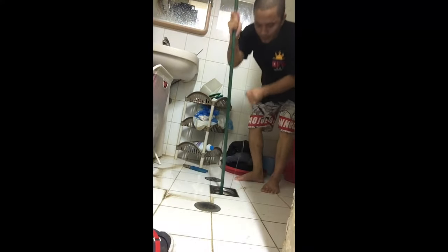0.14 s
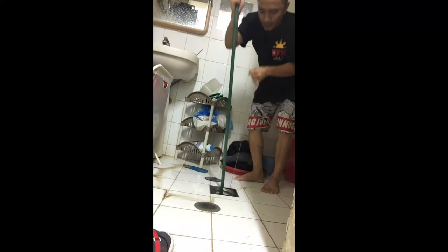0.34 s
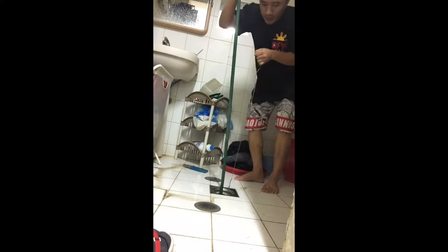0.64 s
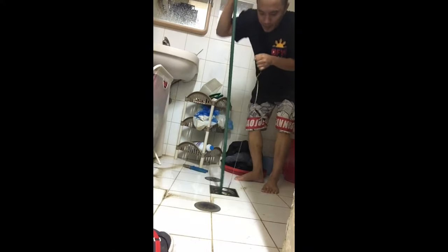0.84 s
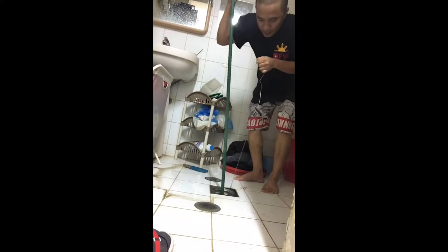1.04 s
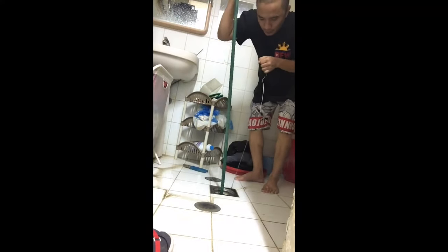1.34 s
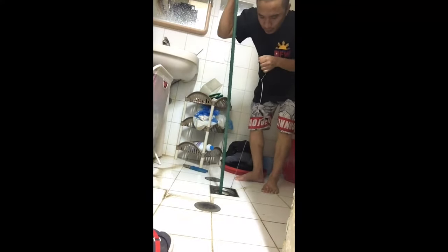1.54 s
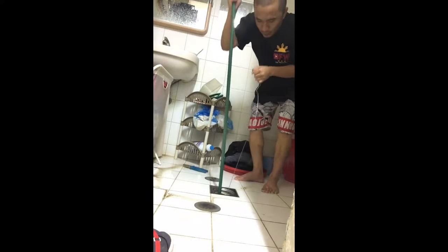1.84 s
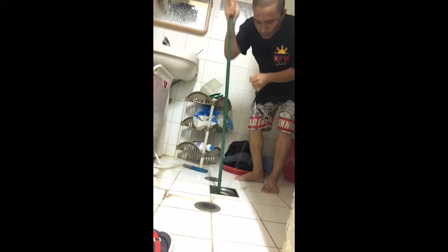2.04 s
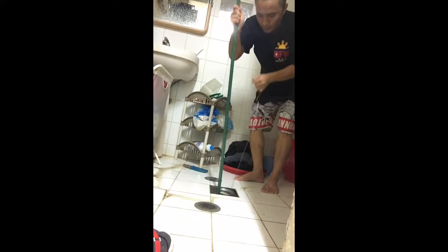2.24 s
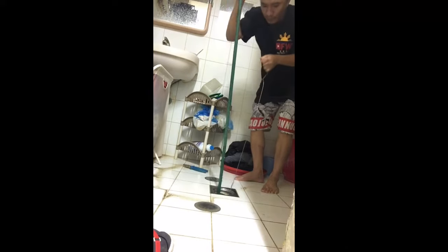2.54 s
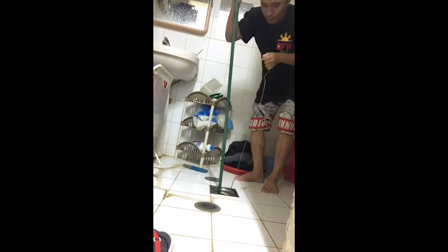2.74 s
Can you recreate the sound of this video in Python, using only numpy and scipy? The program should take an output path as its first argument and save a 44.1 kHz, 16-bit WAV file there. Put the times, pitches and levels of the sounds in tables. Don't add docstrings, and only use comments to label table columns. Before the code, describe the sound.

A pole plunger works a clogged floor drain: a rough, gulping water surge, a sharp knock and bubbles, a quiet gap, then scattered knocks and a second surge; small reverberant tiled bathroom, close microphone.

```python
import sys
import numpy as np
from scipy import signal
from scipy.fft import rfft, irfft
from scipy.io import wavfile
from scipy.ndimage import uniform_filter1d

SR = 44100
rng = np.random.default_rng(int(sys.argv[2]) if len(sys.argv) > 2 else 0)


def dump_mix(stems):
    frames = np.atleast_2d(stems).T
    limited = np.clip(frames, -1, 1)
    pcm = np.round(limited * 32767).astype(np.int16)
    wavfile.write(sys.argv[1], SR, pcm)


def volts_from_db(level):
    exponent = np.asarray(level, float) / 20
    return 10 ** exponent


N = 125685


def rms_one(x):
    return x / np.sqrt(np.mean(x ** 2) + 1e-20)


def bandpass(x, order, low_hz, high_hz):
    return signal.sosfilt(signal.butter(order, [low_hz, high_hz], "band", fs=SR, output="sos"), x)


def resonate(x, hz, width_hz):
    r = np.exp(-np.pi * width_hz / SR)
    poles = [1, -2 * r * np.cos(2 * np.pi * hz / SR), r * r]
    return signal.lfilter([(1 - r * r) / 2, 0, (r * r - 1) / 2], poles, x + 1e-18)


def shapes(rows, fall_db_s):
    start, rise, hold = np.array(rows)[:, :3].T[:, :, None]
    t = np.arange(N) / SR - start
    rise = np.abs(rise) + 1e-4
    return np.clip(t / rise, 0, 1) ** 2 * volts_from_db(-fall_db_s * np.maximum(t - rise - hold, 0))


def drift(rate_hz):
    r = np.exp(-80 * np.pi * rate_hz / SR)
    slow = signal.lfilter([1], [1, -2 * r, r * r], rng.standard_normal(N // 40 + 2002))[2000:]
    return np.interp(np.arange(N) / 40, np.arange(len(slow)), rms_one(slow))


def grains(per_s, spread_db, smooth):
    size = volts_from_db(spread_db * np.minimum(rng.exponential(1, N), 4)) * rng.choice([-1, 1], N)
    clicks = rms_one(size * (rng.random(N) < per_s / SR))
    return rms_one(clicks + smooth * rng.standard_normal(N))


def place(hits):
    out = np.zeros(N + 6000)
    for t_s, sound in hits:
        at = int(t_s * SR)
        out[at:at + len(sound)] += sound
    return out[:N]


EDGES_HZ = 36 * 2 ** np.arange(0, 9.3, .4)


def bands(sources, spectrum):
    centre_hz = np.sqrt(EDGES_HZ[1:] * EDGES_HZ[:-1])
    at_hz, db = np.transpose(spectrum)
    gain = volts_from_db(np.interp(np.log(centre_hz), np.log(at_hz), db, left=-60))
    rows = []
    for k, g in enumerate(gain):
        source = np.roll(sources[k % 2], k // 3 * 5000)
        rows.append(g * bandpass(source, 2, EDGES_HZ[k], EDGES_HZ[k + 1]))
    rows = np.array(rows)
    return centre_hz, rows / np.std(rows.sum(0))


# t/s, rise/s, hold/s, level/dB, brightness/(dB/octave) about 1500 Hz
SURGE_EVENTS = [(-.01, 0.0012, 0.0085, -30.5, -1.3), (0.055, 0.0085, 0.04, -51.5, 6.5),
                (0.134, 0.0091, 0.078, -39.5, 0), (0.169, 0.026, 0.032, -33, 1.5),
                (0.226, 0.061, 0.07, -27, 2.5), (0.343, 0.04, 0.038, -23, 3), (0.445, 0.01, 0.036, -30, -9),
                (0.57, 0.019, 0.13, -51, -1), (0.849, .001, 0.004, -28, 5), (1.427, 0.066, 0.28, -56.5, 5),
                (1.702, 0.0021, 0.046, -33, -7.5), (1.715, 0.031, 0.035, -28.5, 2),
                (1.9094, 0.00081, .003, -38.5, 6.5), (1.979, 0.03, 0.1, -35, 2.5),
                (2.073, 0.0081, 0.063, -30, 4), (2.091, 0.023, 0.036, -27, 2),
                (2.169, 0.02, 0.024, -26, 1.7), (2.262, 0.018, 0.082, -36, 2),
                (2.419, 0.0066, 0.097, -43.5, 3), (2.505, 0.057, 0.016, -36.5, 1),
                (2.566, 0.0079, 0.02, -40, 3), (2.771, 0.0075, 0.036, -49, 6)]
SURGE_FALL_DB_S = 431


def surges():
    level_db, tilt_db = np.array(SURGE_EVENTS)[:, 3:5].T
    flow = shapes(SURGE_EVENTS, SURGE_FALL_DB_S)
    lumps = volts_from_db(1.8 * drift(57))

    def drive(hz):
        return lumps * (volts_from_db(level_db + tilt_db * np.log2(hz / 1500)) @ flow)
    return drive


# f/Hz, density/(dB per Hz)
SPRAY_SPECTRUM = [(240, -53), (400, -3), (511, -20.5), (847, -13), (957, -4.5), (1450, -6.5), (1630, -5.5),
                  (3160, -14.5), (15500, -43)]


def spray(churn, drive):
    hz, rows = bands(churn, SPRAY_SPECTRUM)
    return sum(row * volts_from_db(2.0 * drift(18)) * drive(f) for f, row in zip(hz, rows))


# f/Hz, width/Hz, level/dB
PIPE_RINGS = [(939, 21, 10.5), (1006, 56, 3), (1280, 18, -32), (1282, 125, 3), (1473, 59, 5.5),
              (1775, 97, 2.5), (2150, 210, 2.5), (2800, 180, 0), (4280, 430, -18.5)]
PIPE_DB = -6


def pipe_rings(churn, drive):
    rings = [volts_from_db(db) * resonate(churn, hz, width) * (-1) ** k
             for k, (hz, width, db) in enumerate(PIPE_RINGS)]
    scale = volts_from_db(PIPE_DB) / np.std(sum(rings))
    return scale * sum(ring * volts_from_db(4.05 * drift(35)) * drive(row[0])
                       for ring, row in zip(rings, PIPE_RINGS))


# t/s of peak, peak level/dB, f/Hz
SLUG_EVENTS = [(0.199, -31, 1440), (.225, -30, 282), (.266, -29.5, 930), (.27, -21.5, 291),
               (.288, -26.5, 1410), (.306, -17.5, 1425), (.308, -16.5, 374), (.332, -20.5, 1183),
               (.34, -15.5, 298), (.345, -21.5, 977), (.356, -20, 237), (.378, -19, 992), (0.387, -21, 300),
               (.39, -22, 1890), (.395, -22, 1313), (.403, -24, 1070), (.417, -17.5, 383.6),
               (0.417, -21, 1440), (.44, -18.5, 1028), (0.449, -19, 228), (.485, -25.5, 988),
               (.532, -33, 1300), (0.579, -35.5, 214), (.62, -35, 229), (.862, -25, 1184),
               (.865, -39, 4120), (1.53, -42.5, 232), (1.615, -35.5, 352), (1.635, -38, 242),
               (1.654, -44.5, 2010), (1.685, -41, 242), (1.71, -38, 303), (1.735, -34, 377),
               (1.78, -30.5, 297), (1.914, -38, 4200), (1.917, -40.5, 1100), (2.082, -30.5, 984),
               (2.1, -21, 1006), (2.1, -23.5, 3870), (2.108, -21, 237), (2.112, -31, 1920),
               (2.123, -21, 1314), (2.13, -20, 935), (2.136, -29, 3100), (2.139, -24, 4200),
               (2.15, -24.5, 230), (2.152, -27.5, 447), (2.155, -26, 4410), (2.17, -21.5, 974),
               (2.185, -25, 231), (2.189, -34, 370), (2.215, -25, 1478), (2.245, -26, 296),
               (2.25, -27.5, 231.4), (2.287, -29.5, 900), (2.31, -27.5, 295.6), (2.519, -41, 300),
               (2.582, -27, 377), (2.635, -39.5, 233), (2.679, -46, 238)]
SLUG_SWELL_AT_1KHZ_S, SLUG_PITCH_LAW = 0.004992, 0.5016


def slugs():
    t, hits = np.arange(6000) / SR, []
    for peak_s, db, hz in SLUG_EVENTS:
        swell_s = SLUG_SWELL_AT_1KHZ_S * (1000 / hz) ** SLUG_PITCH_LAW
        env = t / swell_s * np.exp(1 - t / swell_s)
        hits.append((peak_s - swell_s, volts_from_db(db) * np.sin(2 * np.pi * hz * t) * env))
    return place(hits)


# t/s, rise/s, hold/s, level/dB
GULP_EVENTS = [(0.0, 0.00069, 0.014, -40), (0.165, 0.035, 0.019, -29), (0.248, 0.038, 0.015, -22),
               (0.286, 0.017, 0.13, -27.5), (0.484, 0.07, 0.025, -62), (0.678, 0.0046, 0.016, -43.5),
               (1.442, 0.044, 0.038, -48.5), (1.575, 0.013, 0.019, -44), (1.645, 0.013, 0.019, -64),
               (1.677, 0.0064, 0.15, -36.5), (1.977, 0.098, 0.018, -28.5), (2.082, 0.0067, 0.15, -29),
               (2.203, 0.0084, 0.081, -37), (2.488, 0.037, 0.016, -37), (2.549, 0.011, 0.027, -38.5),
               (2.623, 0.0056, 0.0074, -52)]
# f/Hz, width/Hz, level/dB
COLUMN_RINGS = [(216, 6.4, -13), (235.35, 2.46, 6.5), (291, 11.3, 1.5), (305, 77, -8), (379, 17.4, -4.5),
                (466, 5.9, -16), (674, 270, -11), (327, 330, -16.5)]
GULP_FALL_DB_S = 174


def gulps():
    push = volts_from_db(np.array(GULP_EVENTS)[:, 3]) @ shapes(GULP_EVENTS, GULP_FALL_DB_S)
    pops = bandpass(grains(per_s=300, spread_db=2, smooth=.8), 3, 195, 620)
    air = 0
    for hz, width, db in COLUMN_RINGS:
        ring = resonate(pops, hz, width)
        even = ring / np.sqrt(uniform_filter1d(ring * ring, size=3500) + 1e-12)
        air = air + volts_from_db(db + 2.6 * drift(23)) * np.sqrt(width) * even
    return push * rms_one(air)


# t/s, peak level/dB, start f/Hz
BUBBLE_EVENTS = [
    (0.702, -32.5, 363),
    (0.714, -37, 445),
    (1.538, -35.5, 290),
    (1.602, -29, 336),
    (1.672, -31, 236),
    (1.703, -42, 262),
    (2.573, -28.5, 367),
]
BUBBLE_DECAY_CYCLES, BUBBLE_RISE_PER_CYCLE = 2.6, .03


def bubbles():
    t, hits = np.arange(4000) / SR, []
    for t_s, db, hz in BUBBLE_EVENTS:
        turns = hz * t
        tone = np.sin(2 * np.pi * turns * (1 + BUBBLE_RISE_PER_CYCLE * turns / 2))
        env = np.minimum(turns, 1) * np.exp(-turns / BUBBLE_DECAY_CYCLES)
        hits.append((t_s, volts_from_db(db) * tone * env))
    return place(hits)


def crack():
    return bandpass(rng.standard_normal(4000), 5, 900, 4100)


# t/s, peak level/dB, main f/Hz, upper f/Hz, upper level/dB
KNOCK_EVENTS = [(0.3016, -14.5, 1290, 2370, -26), (1.439, -40.5, 1830, 3940, -5),
                (1.559, -35.5, 1490, 3550, -4.5), (1.649, -33.5, 1290, 3400, -1.5),
                (1.7045, -31, 1010, 2340, -4), (1.759, -23, 4700, 5630, -32), (1.771, -20, 1095, 2330, 0),
                (1.9124, -28.5, 3920, 5430, -3), (2.0789, -11, 2450, 4000, -6),
                (2.124, -12.5, 960, 3050, -7.5), (2.183, -25.5, 2610, 900, 10),
                (2.204, -15, 1550, 2800, -5.5), (2.556, -28, 2100, 1530, -11)]
KNOCK_CRACK_DB, KNOCK_SWELL_CYCLES = -2, 1.32


def knocks():
    t, hits = np.arange(4000) / SR, []
    for t_s, db, hz, upper_hz, upper_db in KNOCK_EVENTS:
        tau_s = KNOCK_SWELL_CYCLES / np.sqrt(hz * upper_hz)
        ring = np.sin(2 * np.pi * hz * t) + volts_from_db(upper_db) * np.sin(2 * np.pi * upper_hz * t)
        ring = ring + volts_from_db(KNOCK_CRACK_DB) * crack()
        hits.append((t_s, volts_from_db(db) * ring * t / tau_s * np.exp(1 - t / tau_s)))
    return place(hits)


# f/Hz, level/dB, T60/s
RIM_MODES = [(342, 5, 0.023), (643, 4, 0.015), (970, 7.5, .012), (1194, -1.5, 0.032), (1416, 4.5, 0.014),
             (2100, -17, 0.054), (2800, -29, 0.012), (4200, -1, 0.018), (4680, 2, 0.0076),
             (5270, 1.5, 0.0065), (7500, -5, .006), (8960, -4, 0.0053)]
BLOW_S, BLOW_DB, BLOW_CRACK_DB = .8478, -21, -1.5


def rim_blow():
    t = np.arange(4000) / SR
    ring = volts_from_db(BLOW_CRACK_DB) * crack() * np.exp(-t / 0.004)
    for k, (hz, db, t60_s) in enumerate(RIM_MODES):
        ring = ring + volts_from_db(db - 60 * t / t60_s) * np.sin(2 * np.pi * hz * t) * (-1) ** k
    return place([(BLOW_S, volts_from_db(BLOW_DB) * ring * (1 - np.exp(-t / .0007)))])


ROOM_T60_S, ROOM_DB, ROOM_GAP_S, ROOM_DULL_HZ = 0.43, -1.5, 0.00067, 10100


def bathroom(x):
    t = np.arange(SR // 2) / SR
    tail = rfft(rng.standard_normal(len(t)) * volts_from_db(-60 * t / ROOM_T60_S))
    tail = tail / np.sqrt(uniform_filter1d(np.abs(tail) ** 2, size=25))
    tail = irfft(tail, len(t)) * (t > ROOM_GAP_S) * (t < .4)
    tail = signal.lfilter(*signal.butter(1, ROOM_DULL_HZ, fs=SR), tail)
    return volts_from_db(ROOM_DB) * signal.fftconvolve(x, tail / np.sqrt(np.sum(tail ** 2)))[:N]


# t/s, rise/s, hold/s, lower mode level/dB, upper mode level/dB
HEAVE_EVENTS = [(-0.013, 0.012, 0.028, -72, -42.5), (0.25, 0.023, 0.058, -34, -38),
                (0.377, 0.024, 0.04, -36, -33.5), (0.467, 0.024, 0.042, -33, -40),
                (0.577, 0.036, 0.12, -48, -50), (0.814, 0.016, 0.021, -49, -44),
                (1.47, 0.015, 0.18, -63, -39.5), (1.882, 0.018, 0.024, -41, -39),
                (2.08, 0.032, 0.05, -36, -39.5), (2.373, 0.019, 0.021, -39, -49),
                (2.663, 0.037, 0.039, -44, -67)]
# f/Hz, width/Hz
BOOM_MODES = [(65, 8.1), (120, 5.6)]
HEAVE_FALL_DB_S, HUM_DB, HUM_STEP_DB = 259, -52.5, -8.5


def booms():
    env, out = shapes(HEAVE_EVENTS, HEAVE_FALL_DB_S), 0
    for k, (hz, width) in enumerate(BOOM_MODES):
        phase = 2 * np.pi * np.cumsum(hz + 2.86 * drift(10.3)) / SR
        tone = np.sin(phase) * np.sqrt(2) * volts_from_db(1.3 * drift(14))
        heave = volts_from_db(np.array(HEAVE_EVENTS)[:, 3 + k]) @ env
        hum = resonate(resonate(rng.standard_normal(N), hz, 3 * width), hz, 3 * width)
        out = out + resonate(tone * heave, hz, width) + volts_from_db(HUM_DB + HUM_STEP_DB * k) * rms_one(hum)
    return out


# f/Hz, density/(dB per Hz)
HUSH_SPECTRUM = [(21, -37), (35, -9), (65, -2.5), (135, -5), (269, -13.5), (405, -16), (987, -21.5),
                 (1070, -20), (15500, -43.5)]
HUSH_DB = -49.5


def hush():
    return volts_from_db(HUSH_DB) * bands(rng.standard_normal((2, N)), HUSH_SPECTRUM)[1].sum(0)


def scene():
    churn = [grains(per_s=2000, spread_db=2.5, smooth=.8) for _ in range(2)]
    drive = surges()
    pipe = pipe_rings(churn[0], drive)
    slaps, air = slugs(), gulps()
    near = volts_from_db(-9) * spray(churn, drive) + bubbles() + knocks() + rim_blow()
    wet = bathroom(near + volts_from_db(-7.5) * pipe + volts_from_db(-8.5) * air + volts_from_db(-8.5) * slaps)
    direct = near + slaps + volts_from_db(-2.5) * pipe + volts_from_db(-4) * air
    return (direct + wet + booms() + hush())[None]


def low_pass(x):
    return signal.sosfilt(signal.butter(12, 15810, fs=SR, output="sos"), x)


# f/Hz, width/Hz, level/dB
MIC_COLOUR = [(1150, 85, -1), (1630, 120, -1.5), (3700, 500, -1), (8600, 870, -2.5), (14000, 2000, -1.5),
              (4500, 790, 1), (4950, 300, -6), (6200, 790, 4), (6500, 280, -3), (10530, 490, -8)]
MIC_LOW_HZ, MIC_TOP_HZ = 48, 16250


def record(dry):
    for hz, width, db in MIC_COLOUR:
        dry = dry + (volts_from_db(db) - 1) * resonate(dry, hz, width)
    dry = signal.sosfilt(signal.butter(3, MIC_LOW_HZ, "high", fs=SR, output="sos"), dry)
    mix = signal.sosfilt(signal.cheby2(20, 60, MIC_TOP_HZ, fs=SR, output="sos"), dry)
    return low_pass(mix)


dry = scene()
out = record(dry)
dump_mix(out)
```